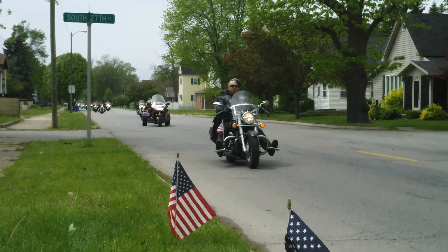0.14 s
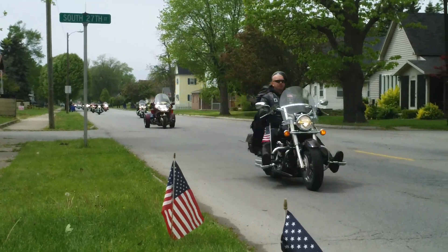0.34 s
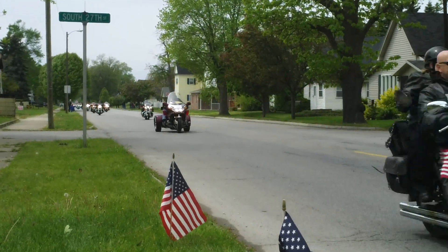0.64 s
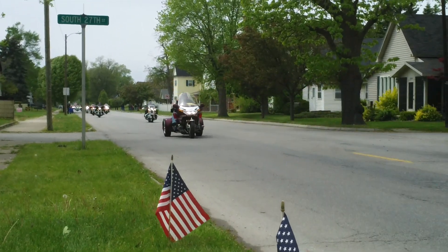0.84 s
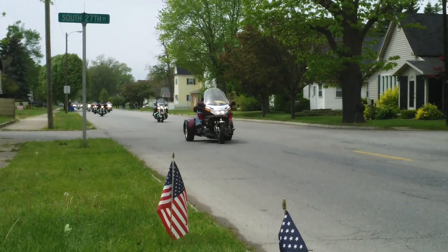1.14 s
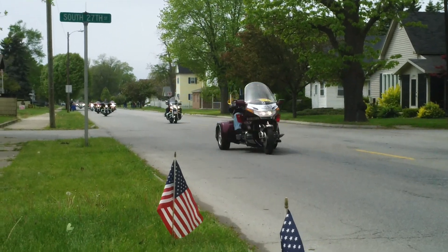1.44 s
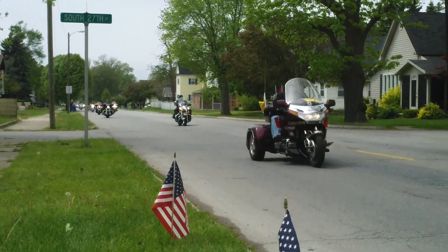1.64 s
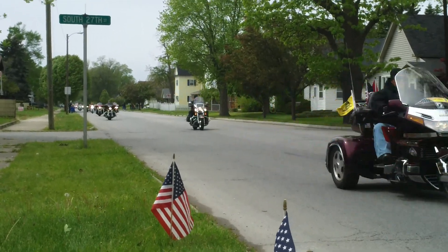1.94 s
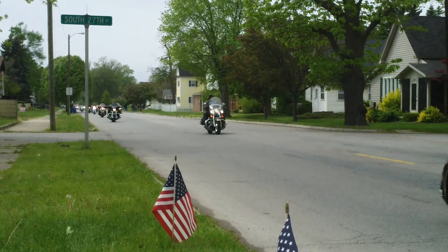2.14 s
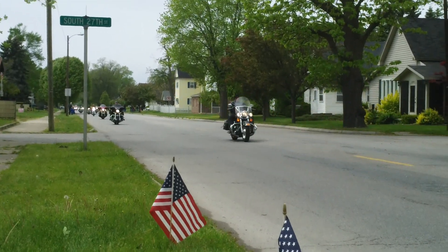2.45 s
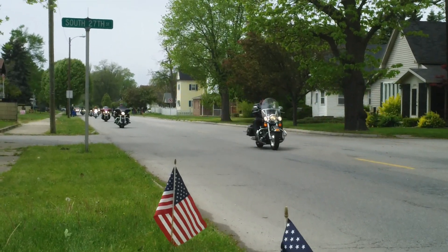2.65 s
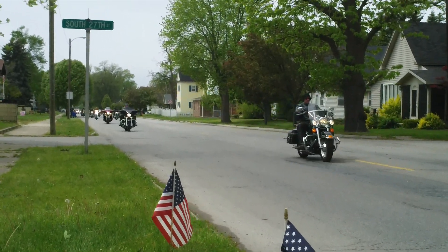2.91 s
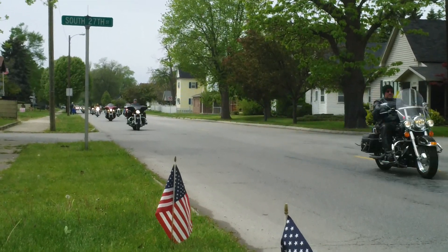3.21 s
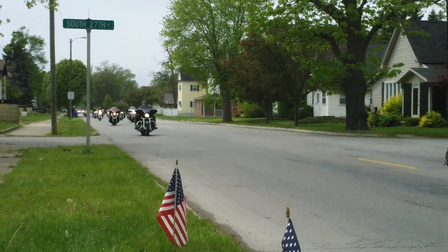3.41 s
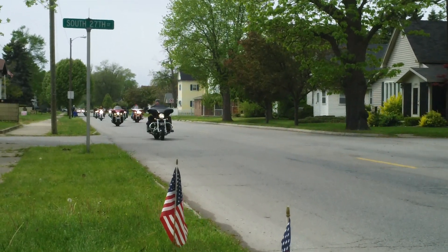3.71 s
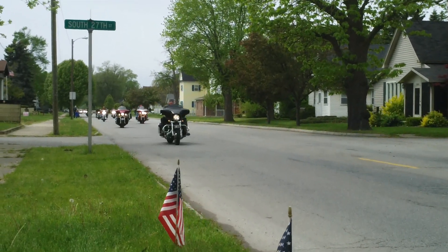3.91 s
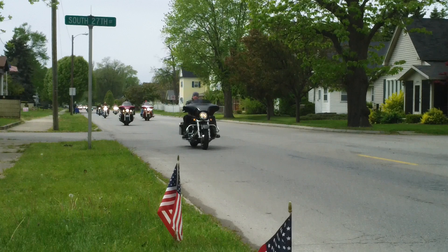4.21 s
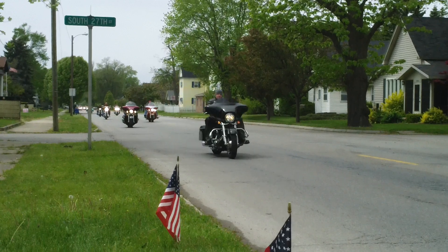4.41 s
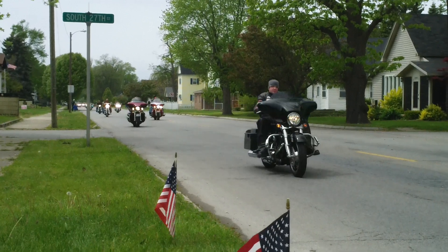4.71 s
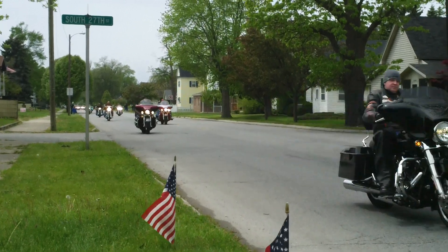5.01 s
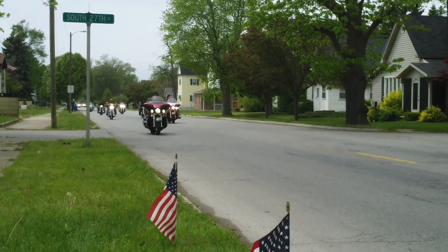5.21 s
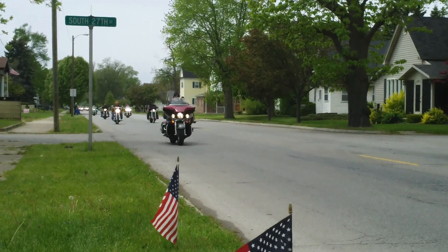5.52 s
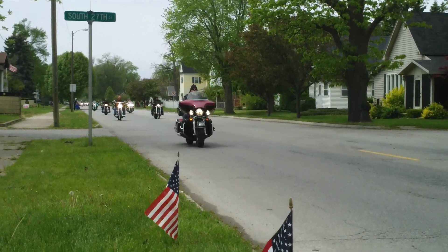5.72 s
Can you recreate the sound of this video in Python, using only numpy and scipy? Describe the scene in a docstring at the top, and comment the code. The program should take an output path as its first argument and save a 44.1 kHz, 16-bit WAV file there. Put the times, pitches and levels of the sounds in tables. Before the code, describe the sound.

Close roadside stereo on an open street, with a low blurred drone of many distant engines throughout. A heavy motorcycle swells immediately and passes at about 0.5 s, deep hum and tyre roar together. A second follows at about 1 s, its exhaust barking and crackling at each uneven firing, a brief hiss behind it. A smoother third approaches with a faint gear whine and whirr, passes near 2.5 s, and its hum drops suddenly at 2.8 s as the throttle closes. Around 3.3 s come a short low tone and two tiny distant pops. The loud fourth bike passes near 4.1 s with hard snapping cracks, hollow barks and faint reflections from a house front, trailing off by 5 s with thin squeaks. The fifth rumbles by very close at about 5.5 s, with bright hiss. Each hum falls in pitch. Deep wind buffets thud and flutter, strongest from 3.5 to 5 s, continuing to the end.

```python
"""An engine hum and road roar swell at once as the first of five heavy motorcycles rolls past a low microphone.
Each hum is a stack of sines on the engine's firing cycle, falling in pitch as the bike passes.
The second and fourth bikes also crack and bark: bursts of noise and ringing pulses at each firing.
Tyre and machine noise is built from noise bands, with a ground echo; thin tones and trailing hiss join in.
Low noise makes the gusts that buffet the microphone's left and right ports, over a drone of far engines."""
import sys
import numpy as np
from scipy import signal
from scipy.fft import rfft, irfft
from scipy.io import wavfile
from scipy.ndimage import uniform_filter1d, map_coordinates

SR = 44100
rng = np.random.default_rng(int(sys.argv[2]) if len(sys.argv) > 2 else 0)


def to_linear_factor(level_db):
    """Convert decibel levels (scalar or array-like) to linear amplitude factors."""
    exponent = np.asarray(level_db, float) / 20
    return 10 ** exponent


def bounce(signal):
    """Save signal as a 16-bit WAV file at the path given by the first command-line argument."""
    frames = np.transpose(np.atleast_2d(signal))
    limited = np.clip(frames, -1, 1)
    pcm = np.round(limited * 32767).astype(np.int16)
    wavfile.write(sys.argv[1], SR, pcm)


N = 258190   # length in samples

# Bikes and their paths: closest_s, cycles_per_s, speed_m_s, closest_m, rev_change_per_s
BIKES = [(.56, 20.347, 14.968, 5.742, -.005), (1.014, 13.852, 18.603, 3.002, .006),
         (2.563, 18.549, 12.217, 2.565, -.008), (4.01, 19.344, 15.355, 5.172, -.002),
         (5.581, 20.064, 7.258, .903, -.039)]
# Engine tone, a row per bike: level_db of orders 1, 2, 3, .. of the cycle, before the pass level
ORDERS_DB = [(-48, -25, -29, -4, -1, -6, -9, -25, -12, -18, -7, -13, -9, -14, -11, -12, -12, -9, -20, -23, -23, -25, -26, -34, -33, -29, -27, -27, -36, -41, -32, -48, -39, -37, -35, -38),
             (-29, -40, -25, -16, 0, -5, -5, -20, -5, -8, -14, 0, -3, -14, -7, -4, -5, -6, -7, -35, -28, -22, -26, -38, -27, -19, -23, -17, -22, -35, -27, -21, -22, -22, -23, -19),
             (-23, -36, -16, -17, -31, 0, -18, -16, -19, -22, -22, -14, -27, -34, -8, -42, -25, -24, -18, -29, -11, -33, -15, -26, -28, -33, -25, -32, -23, -35, -32, -30, -36, -33, -41, -43),
             (-9, -22, -15, -18, 0, -5, -13, -13, -16, -14, -14, -14, -17, -12, -20, -24, -23, -20, -25, -24, -28, -31, -35, -29, -33, -32, -38, -38, -33, -33, -34, -38, -32, -31, -31, -29),
             (-28, -33, -18, -6, 0, -9, -19, -4, -20, -11, -11, -13, -26, -23, -16, -15, -26, -20, -28, -22, -25, -28, -23, -34, -35, -37, -36, -30, -40, -37, -38, -49, -38, -43, -55, -56)]
# Engine pass, a row per bike: loudest_s, low_orders_db, upper_orders_db, swell_s, fade_s
ENGINE = [(.52, -41, -45, 0.5, 0.18), (0.93, -45.5, -43, 0.19, 0.21), (2.58, -37, -39.5, .22, 0.33),
          (4.1, -34, -34.5, 0.19, 0.27), (5.54, -34, -32.5, 0.14, 0.22)]
# How fast the upper orders die with distance, against the low ones: one factor per bike
UPPER_STEEPNESS = (1.3, 1.3, 1.8, .9, 1.5)
# Two-cylinder firing, by bike index: first_cycles, gap_to_second_cycles
FIRING = {0: (.6, .418), 1: (.36, .43), 3: (.745, .418), 4: (.6, .418)}
# How far the orders stray from the firing, by bike index: spread_rad
LOCK_SPREAD_RAD = {0: .9, 1: .7, 3: .5, 4: .9}
# The left port turns over in phase as the pipe goes by, a row per bike: middle_s, over_s
TURNS = [(.33, 0.21), (1.0, 0.12), (2.56, 0.3), (4.0, 0.35), (5.502, 0.14)]
# Throttle of the second and fourth bike, as crack level, by bike index: time_s, level_db
CRACKS = {1: [(.3, -79), (.95, -66), (1.3, -72), (1.44, -58), (1.7, -59), (2.15, -60), (2.4, -75),
          (2.62, -60), (2.84, -52), (2.93, -62), (3.02, -69), (3.2, -64), (3.45, -68), (3.6, -90)],
          3: [(3.55, -81), (3.7, -62), (3.95, -51), (4.2, -53), (4.45, -50), (4.75, -53), (5.0, -65),
          (5.3, -93)]}
# Second cylinder's cracks against the first, by bike index: level_db
SECOND_CRACK_DB = {1: 0, 3: -5}
# Colour of the cracks, by bike index: pitch_hz, density_db (per Hz)
CRACK_COLOUR = {1: [(1500, -39), (4000, -3), (6000, 0.5), (9000, 10), (11500, -3), (13000, -22),
                (16000, -50)], 3: [(1000, 9), (2200, -10), (3400, 9), (5500, 2.5), (8000, 10.5), (10500, 1),
                (13000, -3), (16000, -20)]}
# Barks from the pipe mouth, by bike index: loudest_s, peak_db, swell_s, fade_s
BARKS = {1: (.67, -40.5, .22, .3), 3: (4.12, -38.5, .42, .8)}
# Colour of the breath in a bark: pitch_hz, density_db (per Hz)
BARK_COLOUR = [(150, -70), (450, 11), (750, 24), (1200, -14), (2000, -27), (5000, -35)]
# Cracks returned by a house front, by bike index: late_s, then rows of time_s, level_db
RETURNS = {1: (.023, [(.6, -80), (.95, -65), (1.2, -63), (1.35, -70), (1.45, -90)]), 3: (.039, [(3.9, -80),
           (4.15, -57), (4.35, -58), (4.6, -63), (4.8, -75)])}
# Colour of the returned cracks: pitch_hz, density_db (per Hz)
RETURN_COLOUR = [(3000, -21), (7000, -22), (10000, 1), (13000, -7), (16000, -21)]
# Tyres and machinery, a row per bike: loudest_s, swell_s, fade_s, abreast_pan_db (added left minus right)
PASSES = [(.45, 0.56, 0.3, -3.5), (.97, 0.28, 0.14, -8.5), (2.42, 0.37, 0.41, -8), (3.95, 0.32, 0.28, -7.5),
          (5.46, 0.24, 0.23, -9)]
# Band levels of each bike at its loudest, before the road colour: rumble_db, roar_db, whirr_db, hiss_db, sizzle_db
PASS_DB = [(-52.5, -62, -69.5, -73.5, -79), (-48.5, -60, -64, -70.5, -65), (-53.5, -60, -74, -78.5, -86),
           (-49.5, -68.5, -67, -73.5, -70), (-52, -58, -63, -68, -66.5)]
# The same five levels for the far column: rumble_db, roar_db, whirr_db, hiss_db, sizzle_db
STREET_DB = (-84, -65.5, -106, -129, -99)
# How fast each of the five dies with distance: one factor each
STEEPNESS = (1.41, 2.1, 0.94, 1.4, 1.8)
# Shift of each of the five peaks, positive is later: late_s
LATE_S = (0.041, -0.043, -0.011, -0.072, -0.058)
# Where the five levels sit in the spectrum: pitch_hz
ROAD_CENTRES_HZ = [600, 1300, 3600, 9500, 13000]
# Fine colour of the road noise, added to the five levels: pitch_hz, level_db
ROAD_COLOUR = [(60, 6), (90, 4), (240, 19), (320, 15.5), (600, 10), (950, 12.5), (1400, 11.5), (2000, 7.5),
               (2840, 1.5), (4300, 5.5), (5600, 3), (7000, 13), (9500, 3), (10800, -2.5), (12000, 22),
               (14000, -11.5), (15500, -3)]
# Left-right likeness of the road noise ahead: pitch_hz, likeness (1 is alike)
LIKENESS = [(60, 0.073), (200, 0.67), (600, 0.81), (1600, 0.89), (5000, 1), (9000, 0.96), (13000, 0.096)]
# Drive noise of the third bike, before the side gains: time_s, pitch_hz, level_db
WHIRR = [(1.1, 1290, -101), (1.3, 1290, -72.5), (1.7, 1280, -75.5), (2.0, 1270, -69), (2.25, 1240, -62.5),
         (2.5, 1190, -78), (2.8, 1170, -88)]
# Gear tone of the third bike, heard from the front, before the side gains: time_s, pitch_hz, level_db
WHINE = [(1.65, 552, -77), (2.0, 556, -72), (2.301, 555.5, -63), (2.4, 548, -64), (2.47, 554, -76)]
# Bright hiss just after some bikes pass, before flutter and side gains: middle_s, width_s, level_db
TRAILS = [(1.02, 0.13, -72.5), (4.13, 0.2, -70.5), (5.5, 0.21, -70)]
# Colour of the trailing hiss: pitch_hz, density_db (per Hz)
TRAIL_COLOUR = [(6500, -18), (8800, -1.5), (10000, 1), (11300, -15), (14000, -27)]
# Three short high rings of the fourth bike's firing, then three thin squeaks, before they tremble:
# start_s, length_s, pitch_hz, level_db
RINGS_AND_SQUEAKS = [(3.961, .005, 3300, -58), (4.221, .004, 3100, -56), (4.274, .0035, 3350, -58),
                     (4.94, .04, 8150, -80), (4.97, .09, 7840, -77), (5.33, .06, 7690, -77)]
# Brief low tone, before the side gains: time_s, pitch_hz, level_db
PORT_TONE = [(3.2, 175, -61), (3.28, 183, -53), (3.35, 153.4, -37), (3.42, 145, -35.5), (3.5, 146, -76)]
# Lone pops from a far pipe, before the side gains: time_s, level_db
POPS = [(3.247, -65), (3.351, -63)]
# Colour of the pops: pitch_hz, density_db (per Hz)
POP_COLOUR = [(500, -30), (1500, -4), (4000, 0), (7000, -10), (14000, -15), (16000, -40)]
# Steady wind strength, as thud: time_s, level_db
BREEZE = [(0, -55), (.8, -62), (1.07, -49), (1.3, -59), (1.8, -63), (2.3, -54), (2.8, -50), (3.2, -42),
          (3.6, -34), (3.8, -29), (4.25, -30), (4.45, -37), (5.0, -41), (5.85, -43)]
# Gusts on the microphone: start_s, thud_db, flutter_db, pan_db (left minus right)
BUFFETS = [(1.05, -46, -54, -5), (2.33, -45, -48, -5), (2.5, -45, -54, 6), (2.68, -48, -54, 5),
           (2.97, -42, -55, -8), (3.15, -38, -55, 5), (3.25, -34, -53, 8), (3.38, -35, -45, 4),
           (3.51, -30, -32, 4), (3.6, -29, -32, -3), (3.69, -25, -31, 2), (3.76, -32, -33, 0),
           (3.81, -24, -31, 0), (3.89, -22, -32, -7), (3.96, -31, -34, 0), (4.02, -30, -33, -3),
           (4.09, -31, -35, 0), (4.17, -25, -30, -2), (4.26, -27, -32, 7), (4.405, -26, -37, -8),
           (4.51, -36, -36, 5), (4.66, -26, -44, -3), (4.77, -31, -54, -5), (4.85, -31, -34, 2),
           (4.95, -28, -45, -2), (5.01, -27, -46, -7), (5.16, -33, -50, 2), (5.285, -29, -44, -9),
           (5.48, -38, -47, 3), (5.56, -33, -43, 5), (5.6, -28, -50, 5), (5.66, -26, -50, -3),
           (5.77, -37, -45, -5)]
# Colour of the wind's deep thud: pitch_hz, density_db (per Hz)
THUD = [(3, -8), (8, 4), (16, 3), (28, -1), (45, -5), (70, -11), (110, -24), (400, -90)]
# Colour of the wind's flutter: pitch_hz, density_db (per Hz)
FLUTTER = [(20, -59), (45, -7), (70, 5), (110, 7), (170, 2.5), (260, -6.5), (400, -18), (700, -44),
           (2000, -100)]
# Drone of the far column: time_s, level_db
DRONE = [(0, -53), (1.2, -56), (1.9, -56.5), (2.6, -50.5), (2.9, -54.5), (5.85, -50)]
# Colour of the drone: pitch_hz, density_db (per Hz)
DRONE_COLOUR = [(35, -41), (65, -0.5), (88, 0), (112, 5.5), (135, -2.5), (250, -50)]

SOUND_M_S = 343
SECOND_DB = -4   # the second cylinder is weaker


def rms_one(x):
    """Scale to an average strength (rms) of 1."""
    return x / np.sqrt(np.mean(x ** 2) + 1e-20)


def in_time(rows):
    """Read the columns of a curve at every sample."""
    s, *columns = np.transpose(rows)
    return [np.interp(np.arange(N) / SR, s, c) for c in columns]


def at_hz(points, hz):
    """Read a spectrum on a log pitch axis."""
    pitch_hz, db = np.array(points).T
    return np.interp(np.log(hz), np.log(pitch_hz), db)


def drift(rate_hz):
    """Slow random wander of strength 1: noise smoothed at every 40th sample, then joined by lines."""
    r = np.exp(-80 * np.pi * rate_hz / SR)
    noise = rng.standard_normal(N // 40 + 2002)
    slow = signal.lfilter([1], [1, -2 * r, r * r], noise)[2000:]   # skip the filter's start
    return np.interp(np.arange(N) / 40, np.arange(len(slow)), rms_one(slow))


def coloured(x, spectrum):
    """Shape noise by a spectrum."""
    hz = np.maximum(np.fft.rfftfreq(N, 1 / SR), 1)
    return irfft(rfft(x) * to_linear_factor(at_hz(spectrum, hz)), N)


def sides(pan_db):
    """Left and right gains that keep the total power."""
    left = to_linear_factor(pan_db)
    return np.array([left, 1 + 0 * left]) * np.sqrt(2 / (1 + left ** 2))


def pass_db(loudest_s, swell_s, fade_s):
    """Loss with distance on a straight pass: 0 dB when nearest."""
    since = np.arange(N) / SR - loudest_s
    return -10 * np.log10(1 + (since / np.where(since < 0, swell_s, fade_s)) ** 2)


def abreast(at_s, width_s):
    """1 while a bike is level with the microphone, 0 far from it."""
    return np.exp(-((np.arange(N) / SR - at_s) / width_s) ** 2)


def passing(closest_s, cycles, speed, gap_m, rev_change):
    """Engine cycles heard so far, distance in m, and how far behind the bike is (-1 ahead, 1 behind)."""
    since = np.arange(N) / SR - closest_s
    distance = np.hypot(since * speed, gap_m)
    behind = since * speed / distance
    doppler = 1 - speed / SOUND_M_S * behind
    rate = cycles * (1 + rev_change * since) * doppler
    return np.cumsum(rate) / SR, distance, behind


def order_phases(k):
    """Start of each order in cycles: on a twin the orders line up into a pressure dip at each firing."""
    order = np.arange(1, len(ORDERS_DB[k]) + 1)
    if k not in LOCK_SPREAD_RAD:
        return rng.random(len(order))
    first, gap = FIRING[k]
    both = np.angle(1 + to_linear_factor(SECOND_DB) * np.exp(-2j * np.pi * order * gap))
    both = both + LOCK_SPREAD_RAD[k] * rng.standard_normal(len(order))
    return both / (2 * np.pi) - order * (first + .01) - .25


def throttle_drop_db(k):
    """The third bike's low orders drop by 12 dB as its throttle closes."""
    if k != 2:
        return np.zeros(N)
    closed = (1 + np.tanh((np.arange(N) / SR - 2.79) / .0089)) / 2
    return -12 * closed


def hum(k, cycle, gone_by):
    """Orders of the firing cycle as sines; the left port dips and turns over in phase as the bike goes by."""
    before_s, after_s = 1.36, 1.05   # heard this long around the loudest moment
    loudest_s, near_low_db, near_upper_db, swell_s, fade_s = ENGINE[k]
    since = np.arange(N) / SR - loudest_s
    on = np.flatnonzero((since > -before_s) & (since < after_s))
    fade = np.minimum(1, np.minimum(since[on] + before_s, after_s - since[on]) / .15)
    loss_db = pass_db(loudest_s, swell_s, fade_s)[on]
    low_db = near_low_db + loss_db + throttle_drop_db(k)[on]
    upper_db = near_upper_db + UPPER_STEEPNESS[k] * loss_db
    # -5 dB on the left from ahead, a little weaker from behind; the imaginary part is left over abreast
    left = to_linear_factor(-5) * (.35j + .12 - .88 * gone_by[on])
    wobble = [drift(2.3)[on] for _ in range(6)]
    starts = order_phases(k)
    out = np.zeros((2, N))
    for order, db in enumerate(ORDERS_DB[k], 1):
        turn = 2 * np.pi * (order * cycle[on] + starts[order - 1])
        size = np.sqrt(2) * fade * to_linear_factor(db + (low_db if order <= 10 else upper_db))
        left_turn = np.angle(left) + .3 * wobble[order % 6]
        out[0, on] += size * np.abs(left) * np.sin(turn + left_turn)
        out[1, on] += size * np.sin(turn)
    return out


def firings(cycle, first, gap, second_db, spread_db):
    """A click at each firing of two cylinders, uneven in strength."""
    fires = np.zeros(N)
    for start, db in (first, 0), (first + gap, second_db):
        at = np.flatnonzero(np.diff(np.floor(cycle - start)))
        fires[at] = to_linear_factor(db + spread_db * rng.standard_normal(200)[:len(at)])
    return fires


def puff(fires, colour, fall_s):
    """A burst of coloured noise at each click, with separate noise in two channels."""
    s = np.arange(round(.02 * SR)) / SR
    burst = np.exp(-s / fall_s) - np.exp(-3 * s / fall_s)
    gate = np.convolve(fires, burst / burst.max())[round(.001 * SR):][:N]   # starts 1 ms early
    return gate * rms_one(coloured(rng.standard_normal((2, N)), colour))


def pipe(k, cycle, distance, gone_by):
    """Each firing spits a noisy crack and a bark that rings the pipe mouth; a wall returns the crack."""
    crack_db, = in_time(CRACKS[k])
    cracks = firings(cycle, *FIRING[k], SECOND_CRACK_DB[k], spread_db=3)
    loudest_s, near_db, swell_s, fade_s = BARKS[k]
    bark_level = to_linear_factor(near_db + 2 * pass_db(loudest_s, swell_s, fade_s))
    barks = bark_level * firings(cycle, *FIRING[k], SECOND_DB, spread_db=1.2)
    late_s, rows = RETURNS[k]
    returned = to_linear_factor(in_time(rows)[0]) * np.roll(cracks, round(late_s * SR))

    noise = puff(to_linear_factor(crack_db) * cracks, CRACK_COLOUR[k], fall_s=.0012)
    noise = noise + to_linear_factor(-15) * puff(barks, BARK_COLOUR, fall_s=.003)
    shared, own = noise + puff(returned, RETURN_COLOUR, fall_s=.0012)

    s = np.arange(round(.01 * SR)) / SR
    ring = np.exp(-s / .001) * np.cos(2 * np.pi * 880 * s) * (1 - np.exp(-s / .00027))
    shared = shared + np.convolve(barks, ring / ring.max())[round(.001 * SR):][:N]
    left = (.15 - .5 * gone_by) * shared + to_linear_factor(-11) * own   # turns over behind
    return road_echo(np.array([left, shared]), np.minimum(distance, 8.5))


def road_levels():
    """Five levels in dB, summed in power over the street and the bikes, and the left-right balance."""
    power = to_linear_factor(2 * np.array(STREET_DB))[:, None] * np.ones(N)
    pan_db = -4   # left minus right from afar
    for (s, swell_s, fade_s, abreast_db), near_db in zip(PASSES, PASS_DB):
        db = np.array([d + steep * pass_db(s + late, swell_s, fade_s)
                       for d, steep, late in zip(near_db, STEEPNESS, LATE_S)])
        db[-1] += -5 * abreast(s, .18)   # the sizzle dips while a bike is abreast
        power = power + to_linear_factor(2 * db)
        pan_db = pan_db + abreast_db * abreast(s, .22)
    return *(10 * np.log10(power)), pan_db


def road(behind):
    """Tyres and machinery: narrow noise bands whose five levels blend across the spectrum."""
    patchy_db, likeness_turn = .88, .72
    *levels_db, pan_db = road_levels()
    edges = 60 * 2 ** np.arange(0, 8.2, .4)
    white = rng.standard_normal((2, 2, N))
    out, together = 0, drift(70.0)
    for k, (low, high) in enumerate(zip(edges, edges[1:])):
        band = signal.butter(2, [low, high], "band", fs=SR, output="sos")
        mid, side = signal.sosfilt(band, white[k % 2])
        hz = np.sqrt(low * high)
        # the likeness of left and right shrinks or turns over behind
        alike = np.clip(at_hz(LIKENESS, hz) * (1 - likeness_turn * (1 + behind)), -.95, .95)
        share = np.array([at_hz(list(zip(ROAD_CENTRES_HZ, row)), hz) for row in np.eye(len(levels_db))])
        flicker_db = patchy_db * (together + drift(34))
        gain = to_linear_factor(at_hz(ROAD_COLOUR, hz) + share @ np.array(levels_db) + flicker_db)
        # the ports point most sharply in the middle of the spectrum
        tilt = at_hz([(100, 0.28), (1000, 1.0), (4000, 0.88), (10000, 0.033)], hz)
        pair = np.sqrt(1 + alike) * mid + np.sqrt(1 - alike) * side * [[1], [-1]]
        out = out + gain * sides(tilt * pan_db) * pair
    return out


def road_echo(x, distance):
    """A grazing echo off the soft verge, inverted and treble only; its lag shrinks with distance."""
    heights_m2 = .24   # twice source height times microphone height
    lagged = np.arange(N) - heights_m2 / distance / SOUND_M_S * SR
    treble = signal.sosfilt(signal.butter(1, 700, "high", fs=SR, output="sos"), x)
    return x - .5 * np.array([map_coordinates(c, [lagged], order=3) for c in treble])


def whirr():
    """Drive noise of the third bike: a tone with slow noise for its level makes a narrow band."""
    width_hz = 120
    hz, db = in_time(WHIRR)
    turn = 2 * np.pi * np.cumsum(hz) / SR
    band = drift(width_hz) * np.sin(turn) + drift(width_hz) * np.cos(turn)
    return to_linear_factor(db) * band * [[.7], [1.3]]


def whine():
    """A clean gear tone of the third bike, a sine that is gone once the bike is abreast."""
    hz, db = in_time(WHINE)
    t = np.arange(N) / SR
    on = np.clip(np.minimum(t - WHINE[0][0], WHINE[-1][0] - t) / .05, 0, 1)
    return np.sqrt(2) * on * to_linear_factor(db) * np.sin(2 * np.pi * np.cumsum(hz) / SR) * [[.7], [1.3]]


def trail():
    """A narrow high hiss of filtered noise, the same in both ports, fluttering in level."""
    level = sum(to_linear_factor(db) * abreast(s, width_s) for s, width_s, db in TRAILS)
    hiss = rms_one(coloured(rng.standard_normal(N), TRAIL_COLOUR))
    return level * to_linear_factor(2.3 * drift(40)) * hiss * [[.8], [1.2]]


def rings_and_squeaks():
    """Short high rings of the fourth bike's firing, then thin squeaks: sines with a trembling level."""
    t, out = np.arange(N) / SR, 0
    for s, length, hz, db in RINGS_AND_SQUEAKS:
        swell = np.sin(np.pi * np.clip((t - s) / length, 0, 1))
        out = out + to_linear_factor(db + 2 * drift(29)) * swell * np.sin(2 * np.pi * hz * t)
    return out


def port_tone():
    """A brief low sine of wavering pitch, mostly in the right port."""
    hz, db = in_time(PORT_TONE)
    return to_linear_factor(db) * np.sin(2 * np.pi * np.cumsum(hz) / SR) * [[.4], [1.6]]


def pops():
    """Single short bursts of broad noise from a far pipe."""
    fires = np.zeros(N)
    for s, db in POPS:
        fires[round(s * SR)] = to_linear_factor(db)
    return puff(fires, POP_COLOUR, fall_s=.0025)[0] * [[.7], [1.3]]


def wind():
    """Lumpy low turbulence, separate noise in each port; each buffet swells softly and dies slower."""
    lumpy_db, rise_s, fall_s = .5, .03, .042
    breeze_db, = in_time(BREEZE)
    flutter_db = -53 + .26 * (breeze_db - breeze_db.mean())   # follows part of the thud's swing
    since, out = np.arange(round(.3 * SR)) / SR, 0
    swell = (1 - np.exp(-(since / rise_s) ** 2)) * np.exp(-since / fall_s)
    swell = swell / swell.max()
    for column, (steady_db, colour) in enumerate([(breeze_db, THUD), (flutter_db, FLUTTER)]):
        lumps = np.array([drift(32.0), drift(33.0)])
        power = to_linear_factor(2 * (steady_db + lumpy_db * lumps))
        for s, *db, pan_db in BUFFETS:
            at = round(s * SR)
            gust = to_linear_factor(db[column]) * sides(np.array([pan_db])) * swell[:N - at]
            power[:, at:at + len(swell)] += gust ** 2
        out = out + np.sqrt(power) * rms_one(coloured(rng.standard_normal((2, N)), colour))
    return out * sides(np.array([-1.5]))


def drone():
    """The far column's engines merge into a low blur: filtered noise, separate in each port."""
    level_db, = in_time(DRONE)
    blur = rms_one(coloured(rng.standard_normal((2, N)), DRONE_COLOUR))
    return to_linear_factor(level_db) * blur * sides(np.array([-1.0]))


def scene():
    """Add up the engines, pipes and road noise of the bikes, the small sounds, the wind and the drone."""
    t = np.arange(N) / SR
    cycle, distance, behind = np.transpose([passing(*bike) for bike in BIKES], (1, 0, 2))
    gone_by = [(t - s) / np.hypot(t - s, over_s) for s, over_s in TURNS]
    hums = sum(hum(k, cycle[k], gone_by[k]) for k in range(len(BIKES)))
    # path of tyres and pipes for the echo: 5.44 m away at closest, rolling at 4.04 m/s
    path = np.array([np.hypot(5.44, 4.04 * (t - s)) for s, *_ in PASSES])
    pipes = sum(pipe(k, cycle[k], path[k], gone_by[k]) for k in CRACKS)
    weight = 1 / (distance ** 2 + 9)   # near bikes rule the left-right likeness of the road noise
    roar = road(np.sum(weight * behind, axis=0) / weight.sum(axis=0))
    nearest = uniform_filter1d(path.min(axis=0), size=4000)
    bikes = hums + pipes + road_echo(roar, nearest) + whirr() + whine() + trail()
    return bikes + rings_and_squeaks() + port_tone() + pops() + wind() + drone()


def low_pass(x):
    """Removes everything above the highest recorded frequency."""
    return signal.sosfilt(signal.butter(12, 15710, fs=SR, output="sos"), x)


def record(dry):
    """Gently cut the deepest bass, below 5.5 Hz."""
    mix = signal.sosfilt(signal.butter(1, 5.5, "high", fs=SR, output="sos"), dry)
    return low_pass(mix)


dry = scene()
out = record(dry)
bounce(out)
```